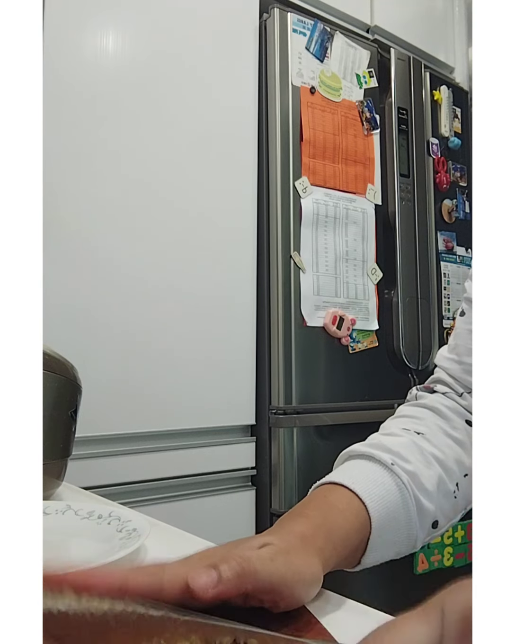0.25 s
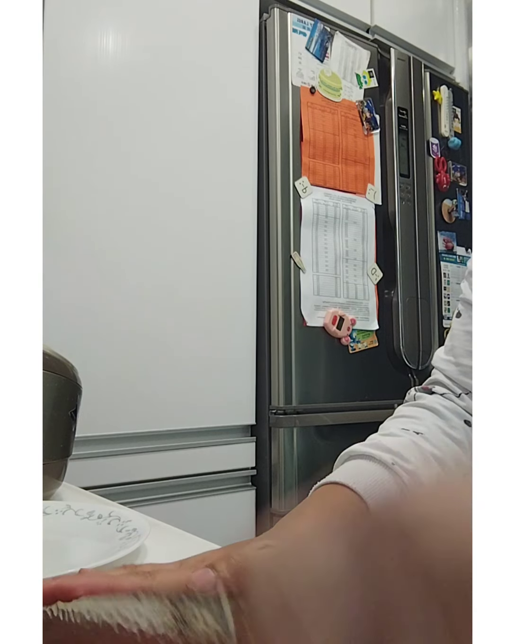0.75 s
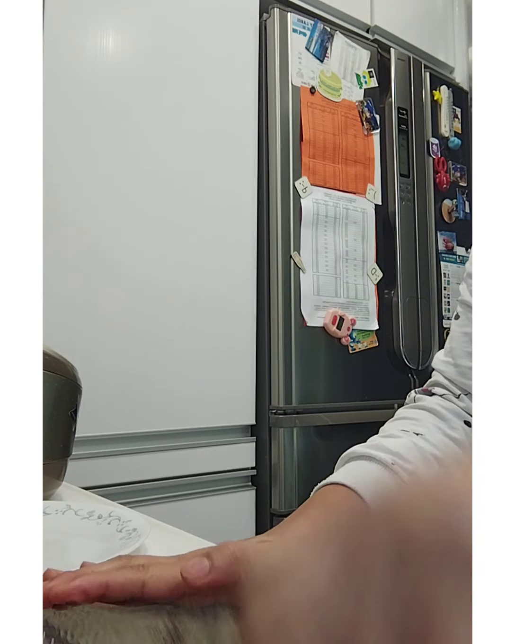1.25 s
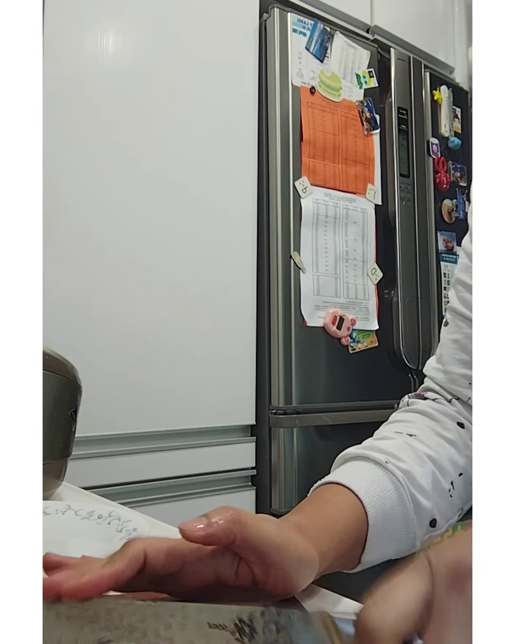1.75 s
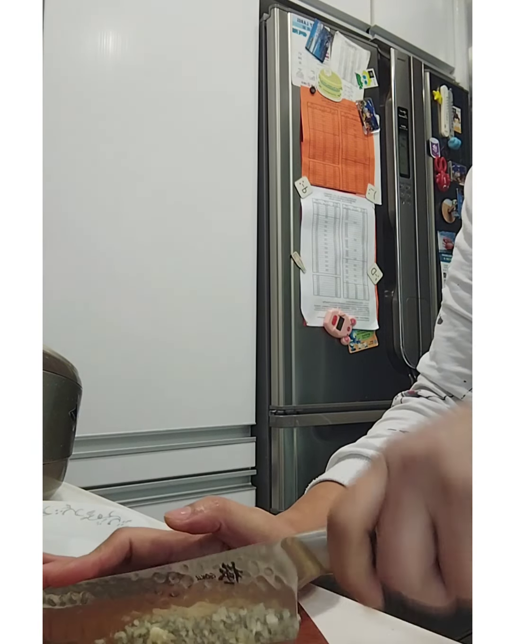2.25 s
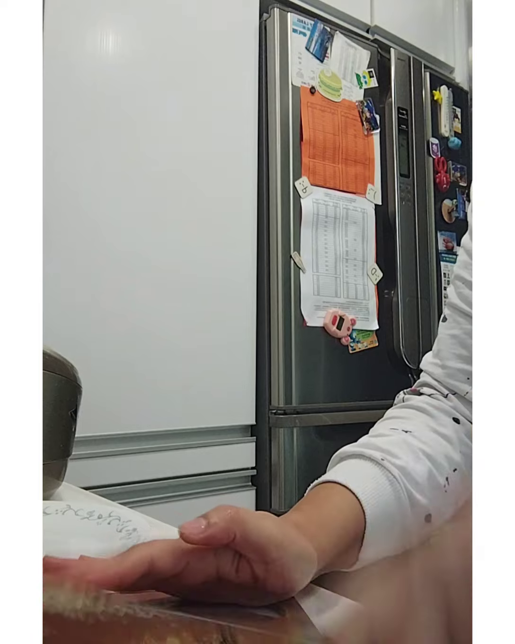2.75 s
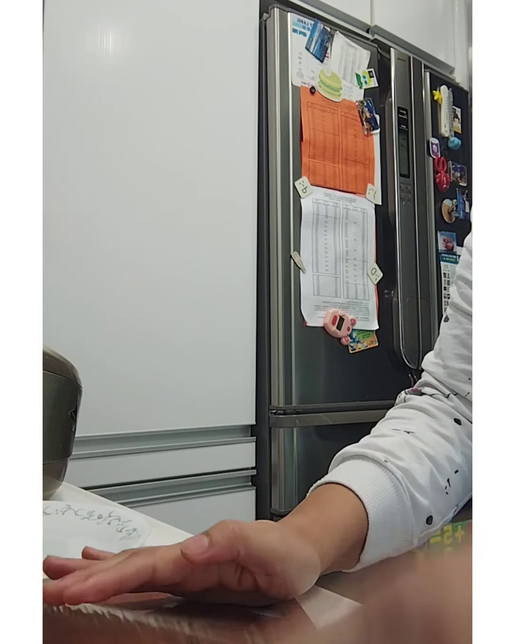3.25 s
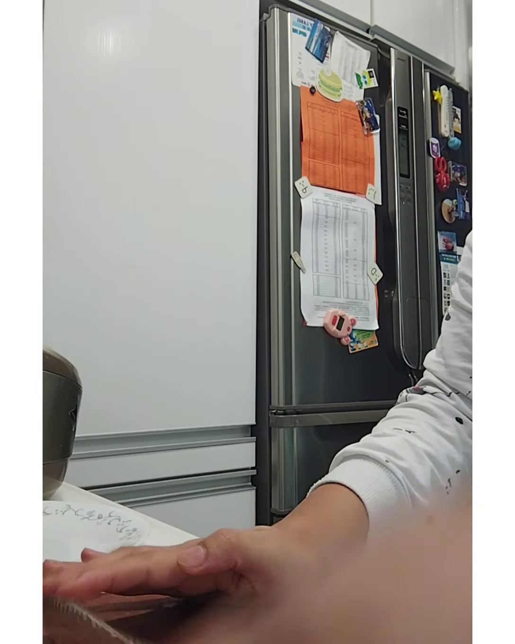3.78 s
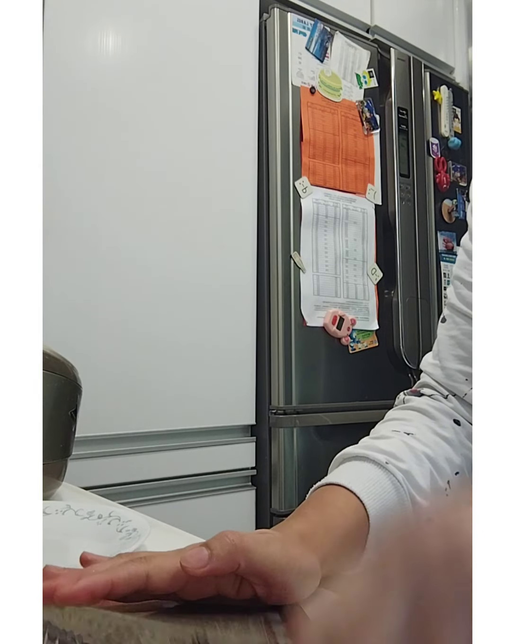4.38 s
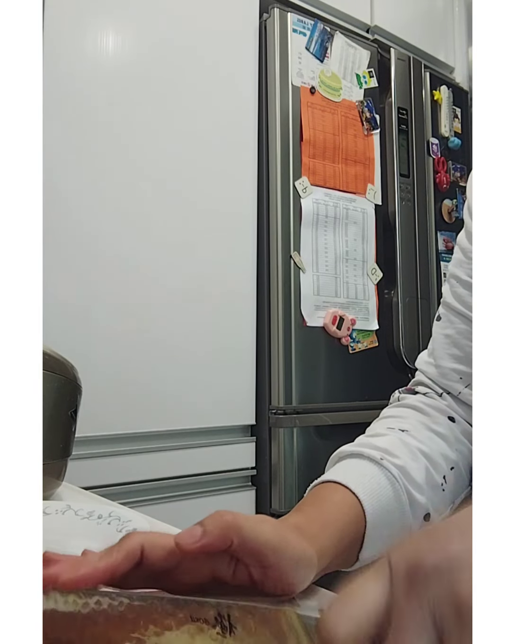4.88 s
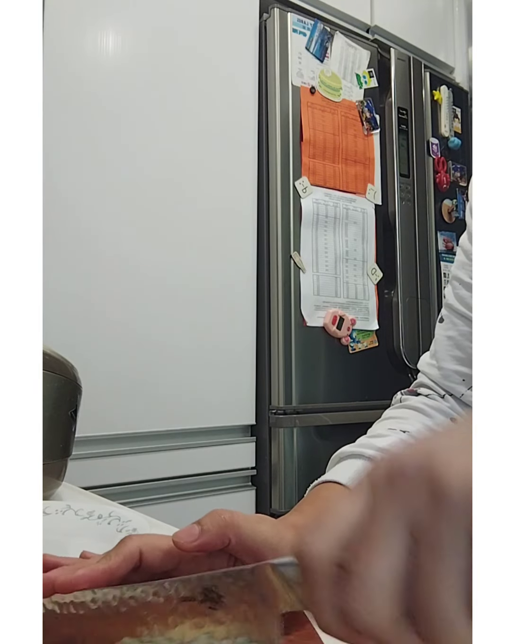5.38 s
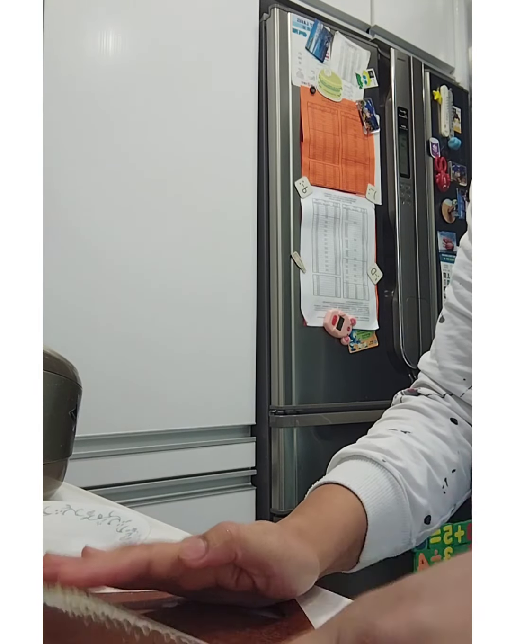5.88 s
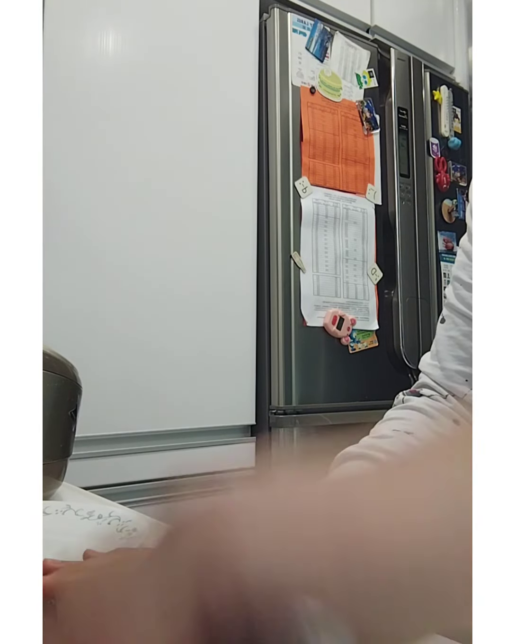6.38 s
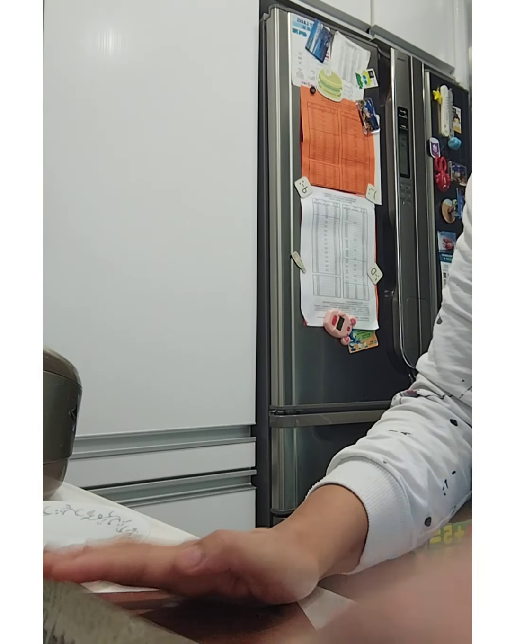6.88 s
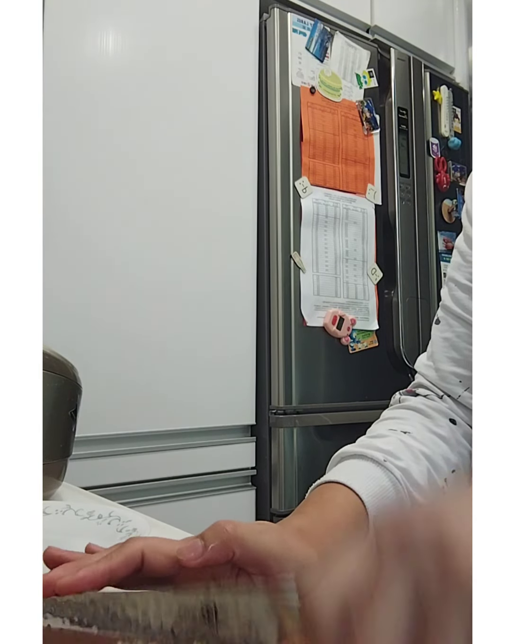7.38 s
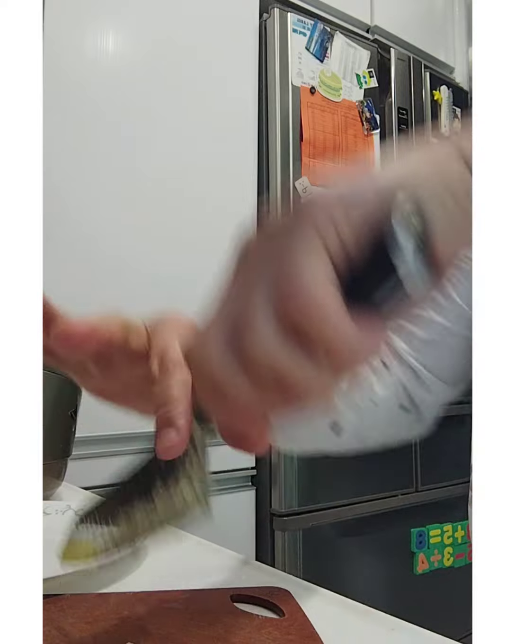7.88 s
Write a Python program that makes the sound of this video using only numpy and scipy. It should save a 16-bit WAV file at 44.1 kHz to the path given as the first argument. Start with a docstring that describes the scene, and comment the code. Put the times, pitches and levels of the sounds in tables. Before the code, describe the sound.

Ginger is rasped back and forth under a steel blade on a wooden board, with gritty scrapes, low judders and three knocks in a kitchen.

```python
"""Ginger under a steel blade, small kitchen

Close stereo from a phone, board on the right: a blade pressed with the palm rasps ginger to and fro on wood.
Each stroke, a bite and two more rubs, tears fibres in tiny snaps: they hiss, ring the steel, rumble in the board.
Under pressure the blade sticks and slips in low judders, mostly with a weak rebound; two of the pushes groan.
Three times the blade lands with a knock. The table booms, close walls answer, a fridge drones faintly."""
import sys
import numpy as np
from scipy import signal
from scipy.fft import rfft, irfft
from scipy.io import wavfile
from scipy.ndimage import map_coordinates

SR = 44100
rng = np.random.default_rng(int(sys.argv[2]) if len(sys.argv) > 2 else 0)


def waveform_to_disk(signal):
    """Save audio, clipped to [-1, 1], as 16-bit WAV at the path in sys.argv[1]."""
    frames = np.transpose(np.atleast_2d(signal))
    scaled = np.clip(frames, -1, 1) * 32767
    samples = np.round(scaled).astype(np.int16)
    wavfile.write(sys.argv[1], SR, samples)


N = 358533

# strokes of the blade, each a bite and two more rubs: (time [s], bite level [dB], nominal bite length [s],
# wait for the second rub [s], further wait for the third [s], level of those two [dB], extra treble [dB])
STROKES = [(0.016, -40.5, 0.09, 0.057, 0.096, -43, 3), (0.29, -38.5, 0.06, 0.075, 0.065, -37.5, 6),
           (0.455, -30.5, 0.033, 0.12, 0.063, -42, -0.5), (0.656, -27.5, 0.032, 0.036, 0.058, -37.5, 1),
           (0.913, -43.5, 0.059, 0.038, 0.054, -40.5, 16), (1.149, -42.5, 0.059, 0.069, 0.062, -43.5, 17.5),
           (1.417, -38.5, 0.087, 0.067, 0.077, -40.5, 13), (1.597, -40, 0.04, 0.044, 0.13, -41, 13),
           (1.803, -35, 0.033, 0.12, 0.014, -38, 7), (1.968, -39.5, 0.11, 0.05, 0.091, -43.5, 12),
           (2.407, -41, 0.068, 0.091, 0.073, -38, 6), (2.536, -26.5, 0.03, 0.1, 0.059, -35.5, 0),
           (2.756, -27.5, 0.04, 0.094, 0.057, -35, -1.5), (2.985, -33, 0.036, 0.067, 0.063, -37, 3),
           (3.204, -35, 0.056, 0.075, 0.045, -36.5, 8), (3.414, -29, 0.038, 0.1, 0.034, -39, 2.5),
           (3.655, -43, 0.051, 0.032, 0.052, -43.5, 17), (3.816, -25.5, 0.022, 0.05, 0.079, -48, -3),
           (4.036, -24.5, 0.04, 0.067, 0.072, -45, -9.5), (4.362, -36, 0.096, 0.016, 0.12, -38.5, 9),
           (4.481, -64, 0.064, 0.085, 0.11, -40, 13), (4.714, -43, 0.041, 0.055, 0.035, -39, 13),
           (4.975, -41, 0.092, 0.071, 0.058, -39.5, 10.5), (5.168, -38.5, 0.11, 0.094, 0.05, -41, 7),
           (5.346, -48, 0.05, 0.066, 0.056, -34.5, 2.5), (5.474, -31, 0.027, 0.07, 0.071, -37, 2.5),
           (5.672, -25.5, 0.028, 0.077, 0.064, -36.5, 0), (5.875, -25.5, 0.018, 0.03, 0.1, -35.5, 0.5),
           (6.075, -27.5, 0.046, 0.086, 0.069, -38.5, 0.5), (6.297, -30, 0.034, 0.058, 0.024, -35.5, 2),
           (6.524, -32, 0.041, 0.098, 0.089, -42.5, -16), (6.761, -41.5, 0.053, 0.062, 0.032, -38, 16.5),
           (7.001, -39, 0.087, 0.075, 0.084, -40, 14), (7.225, -40, 0.069, 0.066, 0.066, -39, 12.5),
           (7.395, -45.5, 0.046, 0.06, 0.14, -39, 11), (7.611, -41, 0.024, 0.072, 0.094, -43.5, 16)]
# tough fibres that snag the blade and give way: (time [s], level [dB])
SNAGS = [(0.521, -28), (2.852, -34), (4.809, -30.5), (6.706, -32.5)]
# stick-slip judders: (time [s], relative level [dB], length [s], slip rate [Hz])
JUDDERS = [(0.085, -26, 0.0032, 296), (0.312, -13, 0.0054, 292.7), (0.464, -18.5, 0.0093, 351.6),
           (0.53, -20.5, 0.02, 290.3), (0.669, -14, 0.016, 350.6), (0.746, -20.5, 0.0091, 310.3),
           (0.792, -21, 0.0037, 325), (1.006, -22.5, 0.0043, 343.7), (1.161, -21.5, 0.0097, 314.7),
           (1.383, -14, 0.0034, 336.7), (1.593, -19, 0.014, 310.3), (1.805, -19, 0.004, 341.3),
           (2.021, -19.5, 0.0042, 327.7), (2.423, -22.5, 0.013, 334.8), (2.647, -11, 0.0038, 335),
           (2.86, -9.5, 0.0033, 341.3), (2.992, -20, 0.014, 344), (3.072, -12.5, 0.0054, 329.3),
           (3.21, -14, 0.02, 351.4), (3.287, -16, 0.0055, 291), (3.423, -11, 0.019, 355),
           (3.5, -15.5, 0.0042, 325.2), (3.698, -16, 0.0039, 302), (3.901, -18, 0.0034, 332.5),
           (4.028, -13.5, 0.013, 334.6), (4.055, -21, 0.024, 379), (4.124, -20, 0.0093, 287),
           (4.508, -16.5, 0.0033, 332.8), (4.724, -14.5, 0.0061, 292.6), (5.148, -16.5, 0.0031, 318),
           (5.361, -24.5, 0.023, 328.8), (5.565, -23, 0.0047, 314.3), (5.686, -23.5, 0.021, 362.5),
           (5.758, -16.5, 0.0037, 332), (6.1, -18.5, 0.0087, 324.4), (6.185, -19.5, 0.0075, 301),
           (6.24, -21, 0.0094, 315), (6.318, -18.5, 0.015, 376.3), (6.382, -18.5, 0.01, 273.6),
           (6.434, -18.5, 0.0081, 331.6), (6.522, -19.5, 0.025, 383), (6.593, -18, 0.004, 288.3),
           (6.76, -21, 0.0067, 295), (6.979, -17.5, 0.013, 316), (7.195, -22, 0.015, 333.6),
           (7.402, -16.5, 0.0057, 340.8), (7.63, -20, 0.01, 369)]
# weak, ragged catches of the blade between the judders: (time [s], relative level [dB])
CATCHES = [(2.484, -30), (2.539, -34), (2.574, -24), (2.716, -29), (4.8, -33.5), (4.977, -26.5),
           (5.475, -25), (5.885, -25), (5.948, -26.5), (6.009, -29.5), (6.71, -25)]
# pushes in which every second slip is stronger: (time [s], relative level [dB], length [s])
GROANS = [(4.044, -19, 0.02), (6.521, -24, 0.014)]
# rubs in which one mode of the steel squeaks: (time [s], level [dB])
SQUEAKS = [(2.762, -30), (5.475, -30.5)]
# the blade set down on the board: (time [s], relative level [dB])
KNOCKS = [(2.171, -4), (4.884, -5), (7.568, -14)]
# ringing modes of the hand-damped blade: (frequency [Hz], width [Hz], relative level [dB])
BLADE_MODES = [(865, 110, -2), (1680, 130, 1), (1960, 130, -1), (2220, 150, -1), (2650, 150, 1),
               (3240, 110, -1), (3720, 120, -6), (4700, 300, -10), (6230, 260, -10)]
# modes of the table under the board: (frequency [Hz], width [Hz], relative level [dB])
TABLE_MODES = [(135, 14, -1.5), (206.5, 12.5, 4), (350, 16, -11)]
# colour of the tearing fibres: (frequency [Hz], relative level [dB])
TEARING_COLOUR = [(40, -33.5), (300, 16), (800, -5), (1150, -5.5), (1700, 4), (2800, -0.5), (4500, -10),
                  (7500, -15), (16000, -45.5)]
# colour of the fine, crisp hiss: (frequency [Hz], relative level [dB])
CRISP_COLOUR = [(1500, -20), (4000, -4), (6200, -2), (7800, -4), (9600, -0.5), (11300, -5), (12000, 3),
                (15500, -2), (17500, -30)]
# colour of the board's rumble: (frequency [Hz], relative level [dB])
BOARD_COLOUR = [(30, -82.5), (100, -4.5), (160, -27.5), (220, -13.5), (330, -7), (460, 4.5), (570, -15.5),
                (850, -10), (1400, -77.5)]
# colour of the knocked wood: (frequency [Hz], relative level [dB])
KNOCK_COLOUR = [(30, -60), (150, -22), (260, -5), (380, 4), (540, -2), (780, 2), (1350, -11), (1800, 2),
                (2900, -5), (4200, -24), (8000, -46)]
# colour of the kitchen's echo: (frequency [Hz], relative level [dB])
ROOM_COLOUR = [(50, -12), (130, 5), (210, 1.5), (350, -7), (700, -1), (1300, -5.5), (16000, 1)]
# colour of the room noise: (frequency [Hz], relative level [dB])
QUIET_COLOUR = [(25, -41), (65, -6.5), (330, -4.5), (700, -5.5), (1500, -22), (15000, -39)]
# colour of the fridge's drone: (frequency [Hz], relative level [dB])
DRONE_COLOUR = [(90, -30), (150, 0), (210, 0), (300, -18), (600, -60)]
# faint tones of the fridge: (frequency [Hz])
WHINE_HZ = [615, 682, 880]
# shading of the far microphone port against the near one: (frequency [Hz], level [dB])
FAR_SHADING = [(60, -5), (260, -17), (400, -15), (700, -10), (2000, -6), (6500, -7), (9000, 3), (12000, 0)]

# rasping
ATTACK_STEEPNESS = 3.86  # exponent of a rub's rise; 2 is a bell curve
FOLLOW_S, SNAG_S = 0.032, 0.0098  # nominal length of a later rub and of a snag
BRIGHT_DB, BRIGHT_AT_DB, BRIGHT_PER_DB = -9, -26, 1.28  # treble minus mids at this level; harder rubs are brighter
SCRAPE_DB, SCRAPE_EXTRA_S, SCRAPE_LEAD_S = -20, 0.0045, 0.0086  # a judder's rasp: level, added length, head start
AIRBORNE_S = 0.037  # the blade hangs in the air this long before a knock
LIFT_S = 7.82  # the blade leaves the board
# juddering
ROUGH, ROUGH_AT_DB, ROUGH_HALVES_DB = 0.29, -18.5, 9.5  # roughness (0-1) at this level; so many dB more halve it
BREAKUP_HZ, BREAKUP_WIDTH_HZ = 355, 95  # faster slips lose step with the board and turn rough
EDGE_S, EDGE_DB_PER_DOUBLING = 0.022, 4  # grips longer than this slip more sharply: their overtones gain
CATCH_S, CATCH_HZ = 0.013, 326.6  # length of a catch and its middle slip rate
REBOUND_S, FREE_S = 0.052, 0.09  # the hand springs back and the blade catches, if no blow follows within FREE_S
REBOUND_DB, REBOUND_PER_DB = -26, 0.3  # relative level after a 0 dB blow, and its rise per dB of the blow
GROAN_HZ = 156.6  # half the slip rate
# knocks and phone
BOUNCE_S, BOUNCE_DB = 0.0046, -9  # the far end of the blade lands just after the first
PORT_LAG_S = 0.00021  # later arrival at the far port
TOP_HZ = 15750  # the phone's upper limit


def undb(db):
    """Decibels to gain."""
    return np.exp(np.asarray(db) * np.log(10) / 20)


def unit(x):
    """Scale to rms 1."""
    return x / np.sqrt(np.mean(x ** 2))


def response(points, size=2048):
    """Causal (minimum-phase) impulse response with the given (frequency [Hz], level [dB]) colour."""
    hz, db = np.transpose(points)
    f = np.maximum(np.fft.rfftfreq(size, 1 / SR), 1)
    log_gain = np.log(undb(np.interp(np.log(f), np.log(hz), db)))
    cepstrum = irfft(log_gain)
    # fold the cepstrum forward in time
    cepstrum[1:size // 2] *= 2
    cepstrum[size // 2 + 1:] = 0
    return irfft(np.exp(rfft(cepstrum)))


def through(x, ir):
    """Pass a sound through an impulse response."""
    return signal.oaconvolve(x, ir)[:len(x)]


def wander(n, rate):
    """Smooth random motion with a spread near 1, through `rate` random points a second."""
    count = n // 50 + 2
    points = rng.standard_normal(count)
    return np.interp(np.arange(n) * rate / SR, np.arange(count), points) * np.sqrt(3 / 2)


def add(track, start_s, x):
    """Mix a sound into a track."""
    i = int(start_s * SR)
    x = x[max(-i, 0):N - i]
    track[max(i, 0):max(i, 0) + len(x)] += x


def rubs():
    """All rasping: judder scrapes, snags, bites and later rubs as (s, dB, length s, treble minus mids dB)."""
    rows = []
    for s, db, length, _ in JUDDERS:
        rows.append((s - SCRAPE_LEAD_S, db + SCRAPE_DB, length + SCRAPE_EXTRA_S, 0))
    rows += [(s, db, SNAG_S, 0) for s, db in SNAGS]
    for s, bite_db, length, second, third, follow_db, extra_db in STROKES:
        rows.append((s, bite_db, length, extra_db))
        for wait in (second, second + third):
            rows.append((s + wait, follow_db, FOLLOW_S, extra_db))
    return [(s, db, length, BRIGHT_DB + BRIGHT_PER_DB * (db - BRIGHT_AT_DB) + extra_db)
            for s, db, length, extra_db in rows]


def pressure(rise=0.79, fall=0.95, drag_db=-58, drag_treble_db=-22, settle_db=-30, settle_s=0.021):
    """Power of the rasp in the mids and in the treble: each rub bites quickly and eases off."""
    t = np.arange(N) / SR
    # between rubs the blade drags lightly and unevenly, until it is lifted away
    drag = undb(drag_db + 2 * wander(N, 35)) * np.clip((LIFT_S - t) * 50, 0, 1)
    # the drag is silent in the air before a knock, then the blade skids a little as it settles
    for s, db in KNOCKS:
        touching = (t < s - AIRBORNE_S) | (t > s)
        skid = undb(db + settle_db) * (t > s) * np.exp(-np.abs(t - s) / settle_s)
        drag = drag * touching + skid
    mids = drag ** 2
    treble = (drag * undb(drag_treble_db)) ** 2
    for s, db, length, bright_db in rubs():
        near = slice(max(int((s - 2 * length) * SR), 0), int((s + 3 * length) * SR))
        rising = t[near] < s
        width = length * np.where(rising, rise, fall)
        edge = np.where(rising, ATTACK_STEEPNESS, 2)  # steep rise, bell-shaped fall
        power = undb(db) ** 2 * np.exp(-np.pi * np.abs((t[near] - s) / width) ** edge)
        treble_share = 1 / (1 + undb(-bright_db) ** 2)
        mids[near] += power * (1 - treble_share)
        treble[near] += power * treble_share
    return mids, treble


def snaps(rate, spread_db):
    """Clicks of very unequal size at random moments, `rate` a second on average."""
    hit = rng.random(N) < rate / SR
    size = undb(spread_db * np.minimum(rng.exponential(size=N), 4))
    return unit(hit * rng.standard_normal(N) * size)


def ring_blade(x, drive_db=4, drift_s=0.001198):
    """The steel rings in damped modes; as the contact travels, each is driven unevenly and all bend in pitch."""
    t = np.arange(SR // 30) / SR
    out = 0
    for hz, width, db in BLADE_MODES:
        drive = undb(db + drive_db * wander(N, 14))
        mode = width * np.exp(-np.pi * width * t) * np.sin(2 * np.pi * hz * t)
        out = out + through(x * drive, mode)
    # a wandering delay bends the pitch
    delay = drift_s * SR * np.abs(wander(N, 20))
    return np.interp(np.arange(N) - delay, np.arange(N), out)


def rubbing(mids, treble, tear_db=2.5, ring_db=-4, crisp_db=0, board_db=1, catch_db=2.0, catch_rate=300):
    """Fibres snap under the moving blade; the snaps hiss and ring the steel, and the board rumbles."""
    # bundles of fibres catch and let go
    catch = unit(undb(catch_db * wander(N, catch_rate)))
    tears, fine = (snaps(12000, spread_db=1.7) * catch for _ in range(2))
    force = np.sqrt(mids)
    torn = undb(tear_db) * force * unit(through(tears, response(TEARING_COLOUR)))
    steel = undb(ring_db) * np.std(force * tears) * unit(ring_blade(tears * force))
    crisp = undb(crisp_db) * np.sqrt(treble) * unit(through(fine, response(CRISP_COLOUR)))
    rumble = unit(through(rng.standard_normal(N) * catch, response(BOARD_COLOUR)))
    return torn + steel + crisp + undb(board_db) * force * rumble


def crackling(mids, db=-7, rate=340):
    """Single coarse fibres snap now and then, louder under a harder rub."""
    coarse = unit(through(snaps(rate, spread_db=5.0), response(TEARING_COLOUR)))
    return undb(db) * np.sqrt(mids) * coarse


def travel(x, depth_db=4.5, rate=45, per_octave=7, above_hz=1000):
    """The rasp's colour shifts from fibre to fibre: narrow bands above the board's rumble swell and sink."""
    hz, s, bands = signal.stft(x, SR, nperseg=512)
    octaves = np.log2(np.maximum(hz / above_hz, 1))
    place = np.meshgrid(per_octave * octaves, rate * s, indexing="ij")
    # random gains on a grid of pitch and time, blended in between
    chance = rng.standard_normal([int(p.max()) + 2 for p in place])
    gain = unit(undb(depth_db * map_coordinates(chance, place, order=1)))
    return signal.istft(bands * np.where(hz[:, None] > above_hz, gain, 1), SR)[1][:N]


def judders(scatter_octaves=0.121):
    """Judders, rebounds and weak catches; a firm grip runs clean: (s, relative dB, length s, Hz, roughness)."""
    blows = sorted((s, db) for s, db, *_ in list(JUDDERS) + list(KNOCKS))
    waits = np.diff([s for s, _ in blows], append=N / SR)
    rebounds = [(s + REBOUND_S, REBOUND_DB + REBOUND_PER_DB * db)
                for (s, db), wait in zip(blows, waits) if wait > FREE_S]
    loose = [(s, db, CATCH_S, CATCH_HZ * 2 ** (scatter_octaves * rng.standard_normal()))
             for s, db in list(CATCHES) + rebounds]
    rows = []
    for s, db, length, hz in list(JUDDERS) + loose:
        slack = min(ROUGH * 2 ** ((ROUGH_AT_DB - db) / ROUGH_HALVES_DB), .5)
        breakup = max(hz - BREAKUP_HZ, 0) / BREAKUP_WIDTH_HZ
        rows.append((s, db, length, hz, min(slack + breakup, 1)))
    return rows


def juddering(level_db=10, skirt_db=-11.5, skirt_s=0.017, jitter=0.2737, loose=0.342,
              second_db=-18, third_db=-27, grit_db=-6, ring_db=-32,
              board_hz=351, sink=4.501, sink_s=0.01798, sink_octaves=.6, brief_octaves=.5):
    """The blade sticks and slips on the board: a pitched buzz, steadier under a firm push."""
    out, slips = np.zeros(N), np.zeros(N)
    t = np.arange(-SR // 16, SR // 16) / SR
    rattle = response([(40, -25.0), (250, -0.5), (480, 2.5), (850, -15.0), (1250, -19.5), (6000, -42)])
    for s, db, length, hz, rough in judders():
        # the grip swells and lets go; a weaker, less even chatter surrounds it
        grip = np.exp(-np.pi / 2 * (t / length) ** 2)
        skirt = undb(skirt_db) * np.exp(-(t / skirt_s) ** 2)
        uneven = rough + loose * (1 - grip) ** 2
        # slips slower than the board's pitch, of a stroke coming to rest, sink as they go; faster ones climb
        bend = -sink_octaves * np.tanh(sink * np.log2(board_hz / hz)) * np.tanh(t / sink_s)
        # a brief grip is bent downward as well
        bend -= brief_octaves * np.exp(-2 * length / sink_s) * np.tanh(t / sink_s)
        rate = hz * 2 ** (bend + jitter * uneven * wander(len(t), 312.7))
        phase = 2 * np.pi * (np.cumsum(rate) / SR + rng.random())
        flutter = undb(2 * uneven * wander(len(t), 300))
        swell = undb(db + level_db) * np.maximum(grip, skirt) * flutter
        sharp = undb(EDGE_DB_PER_DOUBLING * np.log2(length / EDGE_S))
        overtones = undb(second_db) * np.sin(2 * phase) + undb(third_db) * np.sin(3 * phase)
        wave = np.sin(phase) + sharp * overtones
        # uneven slips add a coarse rattle
        grit = unit(through(rng.standard_normal(len(t)), rattle))
        steady = np.sqrt(1 - np.minimum(uneven, 1) / 2)
        add(out, s + t[0], swell * (wave * steady + undb(grit_db) * uneven * grit))
        # each slip ticks the steel
        ticks = np.exp(2 * (np.cos(phase) - 1)) * rng.standard_normal(len(t))
        add(slips, s + t[0], swell * sharp * rough * ticks)
    return out + undb(ring_db) * np.std(out) * unit(ring_blade(slips))


def groaning(waver=0.0247, fall_db=-4.0, level_db=7, deep_db=-13):
    """Alternating strong and weak slips sound a wavering stack on half their rate, over a deep push."""
    t = np.arange(N) / SR
    swell = sum(undb(db + level_db) * np.exp(-np.pi / 2 * ((t - s) / length) ** 4) for s, db, length in GROANS)
    phase = 2 * np.pi * np.cumsum(GROAN_HZ * (1 + waver * wander(N, 150))) / SR
    push = undb(deep_db) * np.sin(phase)
    stack = sum(undb(fall_db * (k - 3)) * np.sin(k * phase + 2 * np.pi * rng.random()) for k in range(3, 8))
    return swell * (push + stack)


def squeaking(hz=3720, waver=0.058, length_s=.022):
    """The edge briefly sings on one wavering mode."""
    t = np.arange(N) / SR
    swell = sum(undb(db) * np.exp(-np.pi / 2 * ((t - s) / length_s) ** 2) for s, db in SQUEAKS)
    return swell * np.sin(2 * np.pi * np.cumsum(hz * (1 + waver * wander(N, 460))) / SR)


def knocking(level_db=17.5, rattle_db=-6, rattle_s=0.0024, ring_db=-11,
             thump_db=-2, thump_hz=390, thump_s=0.0028):
    """The blade lands on the wood, which thumps for a few cycles; the steel chatters and rings briefly."""
    blows, chatters = np.zeros(N), np.zeros(N)
    t = np.arange(SR // 30) / SR
    for s, db in KNOCKS:
        chatter = rng.standard_normal(len(t)) * t * np.exp(-2 * t / rattle_s)
        add(blows, s, undb([db]))
        add(blows, s + BOUNCE_S, undb([db + BOUNCE_DB]))
        add(chatters, s, undb(db + rattle_db) * chatter / np.linalg.norm(chatter))
    wood = unit(through(blows + chatters, response(KNOCK_COLOUR)))
    thump = unit(through(blows, t * np.exp(-2 * t / thump_s) * np.cos(2 * np.pi * thump_hz * t)))
    # the wood cushions the blow, so mostly the lower modes of the steel answer
    steel = unit(ring_blade(wood))
    return undb(level_db) * np.std(blows) * (wood + undb(thump_db) * thump + undb(ring_db) * steel)


def table_top(x, db=-20):
    """The table under the board booms briefly after each push, in a few damped low modes."""
    t = np.arange(SR // 4) / SR
    ring = sum(undb(gain_db) * width * np.exp(-np.pi * width * t) * np.cos(2 * np.pi * hz * t)
               for hz, width, gain_db in TABLE_MODES)
    return undb(db) * np.std(x) * unit(through(x, ring))


def kitchen(x, wet_db=-7.0, t60_low_s=0.34, t60_high_s=0.3, gap_s=0.0037):
    """Diffuse echo of close hard walls, as decaying noise; the treble dies sooner."""
    t = np.arange(SR // 2) / SR
    noise = rng.standard_normal(len(t))
    low = signal.sosfilt(signal.butter(2, 3500, fs=SR, output="sos"), noise)
    tail = low * undb(-60 * t / t60_low_s) + (noise - low) * undb(-60 * t / t60_high_s)
    tail *= np.clip(t / gap_s - 1, 0, 1)  # nothing returns before the gap
    echo = through(tail / np.linalg.norm(tail), response(ROOM_COLOUR))
    return undb(wet_db) * through(x, echo)


def background(noise_db=-55, hum_hz=65, hum_db=-64, drone_db=-54, whine_db=-66):
    """Faint room noise, partly shared by the ports, and the fridge's low drone, wavering hum and thin whine."""
    def tone(hz):
        """A sine whose phase wavers slowly."""
        return unit(np.sin(2 * np.pi * hz * np.arange(N) / SR + wander(N, 2.9) / 2))

    shared = rng.standard_normal(N)
    air = np.array([unit(through(shared + 0.87 * rng.standard_normal(N), response(QUIET_COLOUR)))
                    for _ in range(2)])
    drone = unit(through(rng.standard_normal(N), response(DRONE_COLOUR)))
    hum = undb(hum_db) * tone(hum_hz)
    whine = undb(whine_db) * sum(tone(hz) for hz in WHINE_HZ)
    balance = undb([[-2], [2]])  # left below, right above the levels set here
    return (undb(noise_db) * air + hum + whine + undb(drone_db) * drone) * balance


def scene(apart=.6):
    """The right port hears the board directly, the left later and shaded; both hear table and surroundings."""
    mids, treble = pressure()
    knocks = knocking()
    body = juddering() + groaning() + knocks + squeaking()
    table = table_top(body)
    # fibres tear all along the blade, so each port faces partly different ones
    near, far = (travel(rubbing(mids, treble) + crackling(mids)) for _ in range(2))
    # the knocks reach the left port less shaded
    aside = body + knocks / 2 + np.sqrt(1 - apart) * near + np.sqrt(apart) * far
    left = np.roll(through(aside, response(FAR_SHADING)), round(PORT_LAG_S * SR))
    right = body + near
    return np.array([x + table + kitchen(x) for x in (left, right)]) + background()


def record(dry, ceiling=0.9, low_cut_hz=52):
    """The phone thins the deepest bass, rounds the highest peaks and cuts the top."""
    thin = signal.sosfilt(signal.butter(3, low_cut_hz, "high", fs=SR, output="sos"), dry)
    rounded = thin / (1 + (thin / ceiling) ** 4) ** (1 / 4)
    return signal.sosfilt(signal.ellip(10, .2, 80, TOP_HZ, fs=SR, output="sos"), rounded)


dry = scene()
out = record(dry)
waveform_to_disk(out)
```